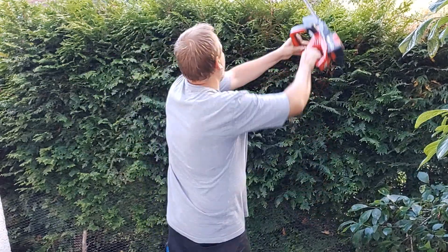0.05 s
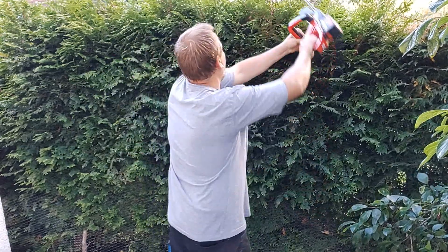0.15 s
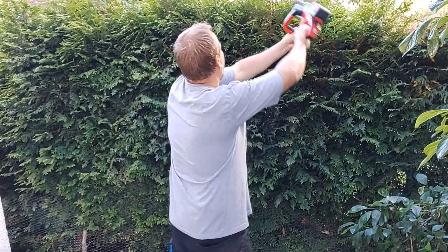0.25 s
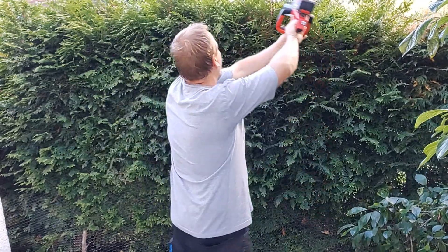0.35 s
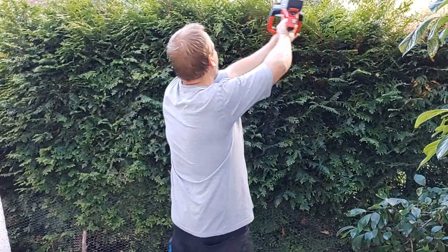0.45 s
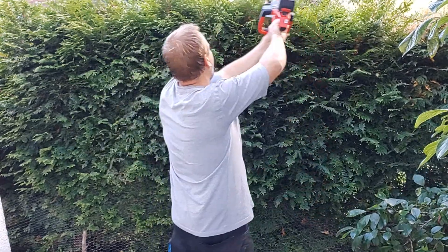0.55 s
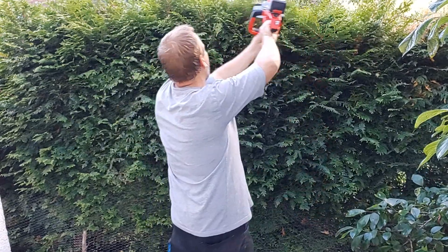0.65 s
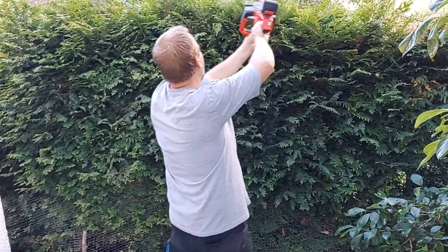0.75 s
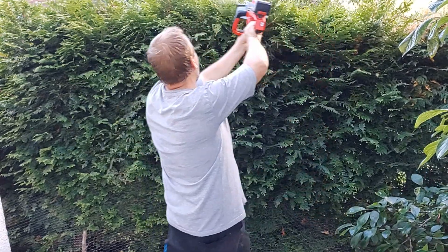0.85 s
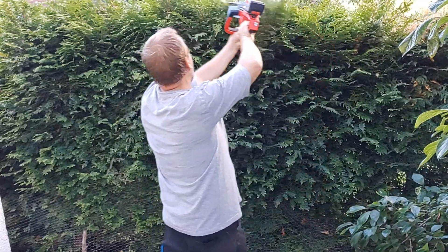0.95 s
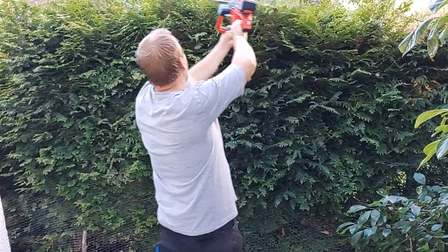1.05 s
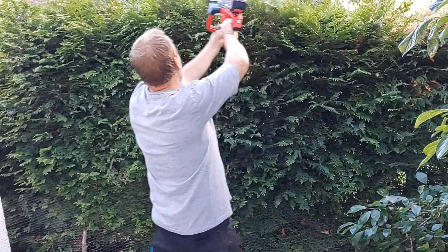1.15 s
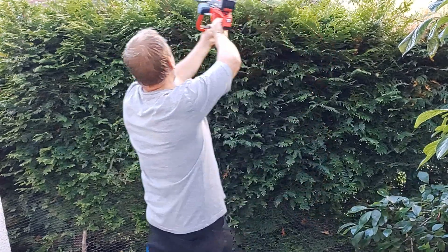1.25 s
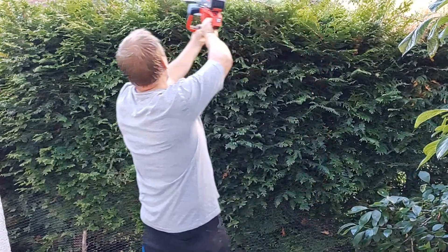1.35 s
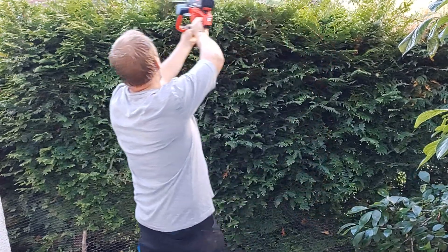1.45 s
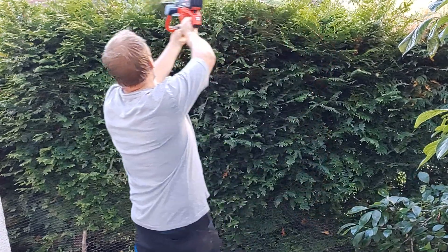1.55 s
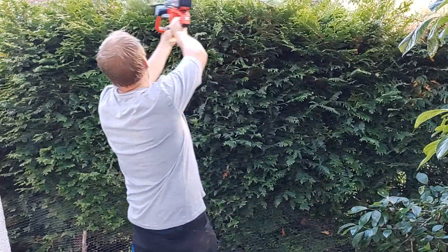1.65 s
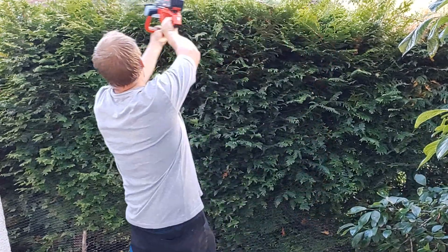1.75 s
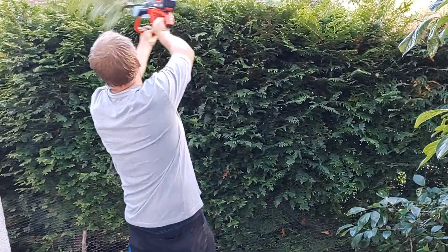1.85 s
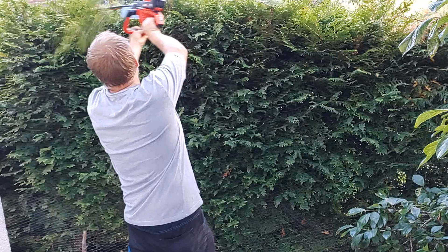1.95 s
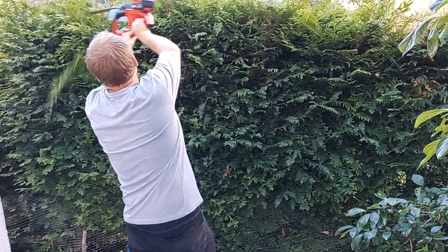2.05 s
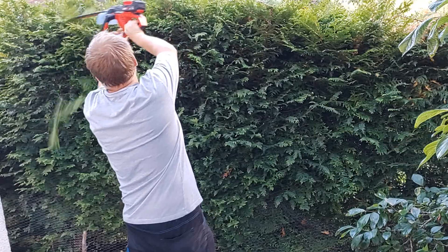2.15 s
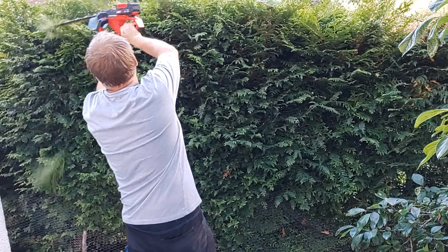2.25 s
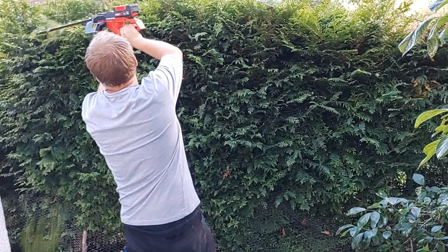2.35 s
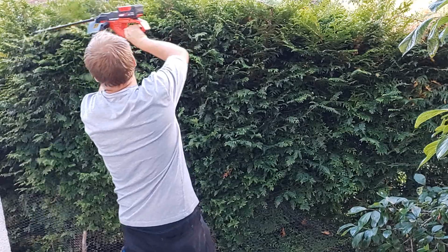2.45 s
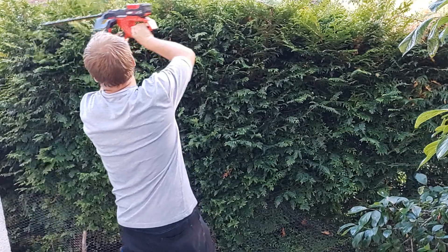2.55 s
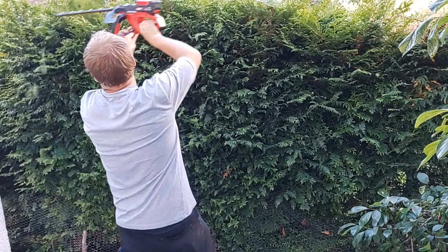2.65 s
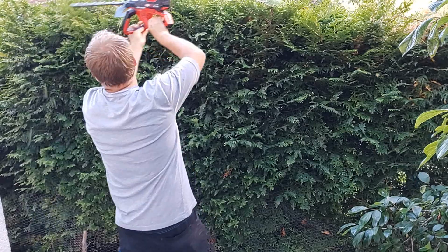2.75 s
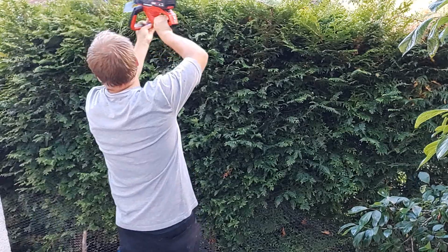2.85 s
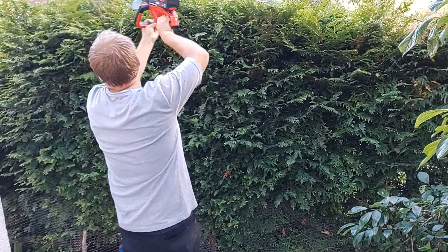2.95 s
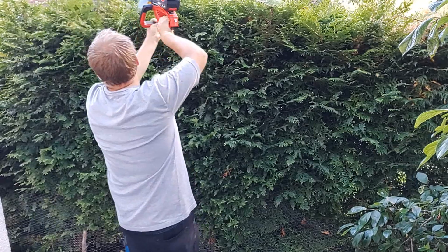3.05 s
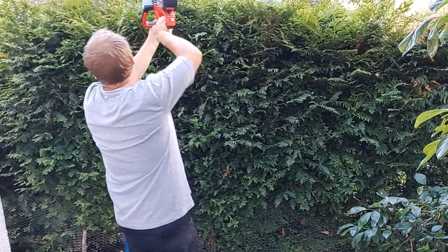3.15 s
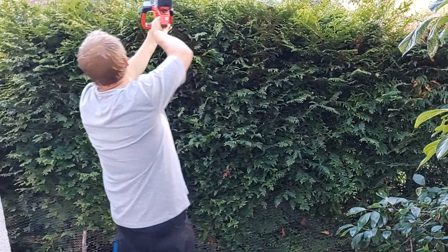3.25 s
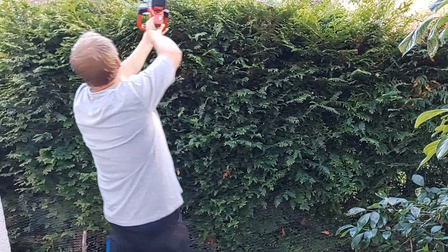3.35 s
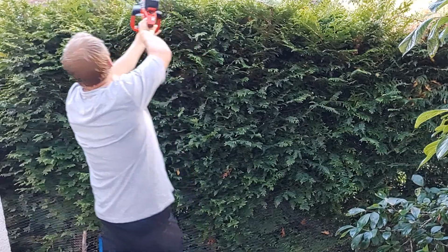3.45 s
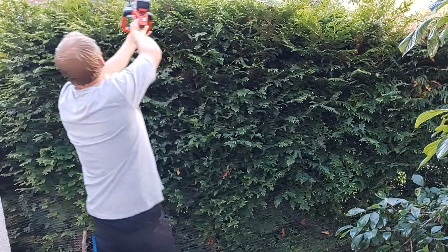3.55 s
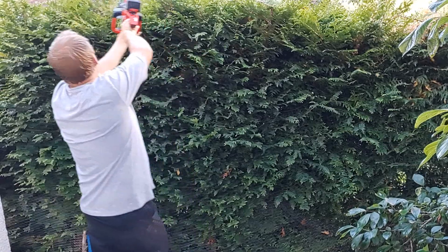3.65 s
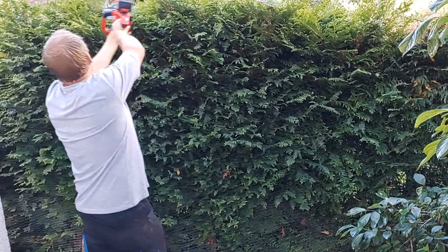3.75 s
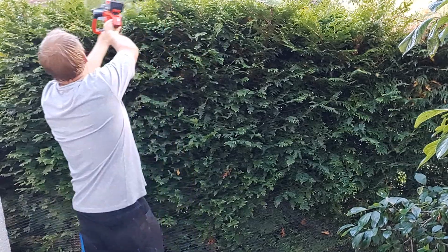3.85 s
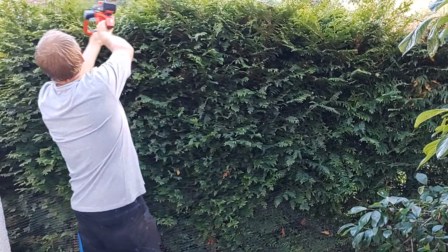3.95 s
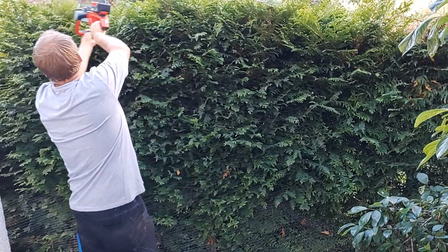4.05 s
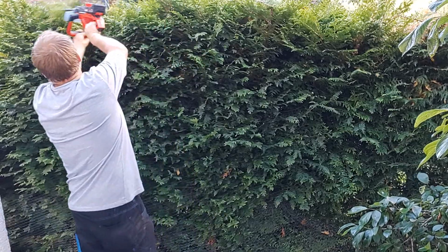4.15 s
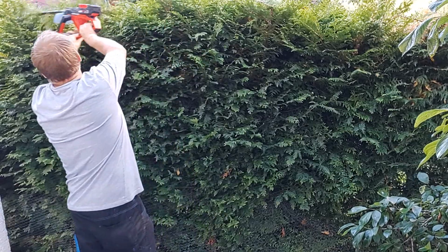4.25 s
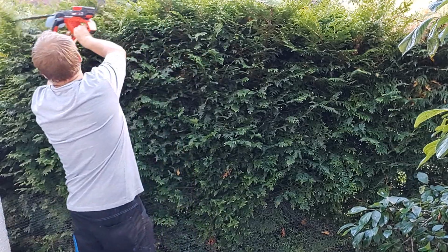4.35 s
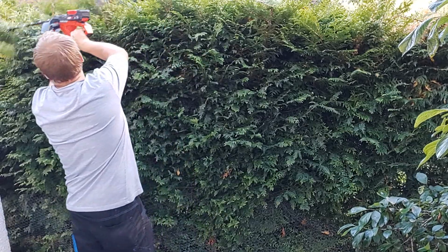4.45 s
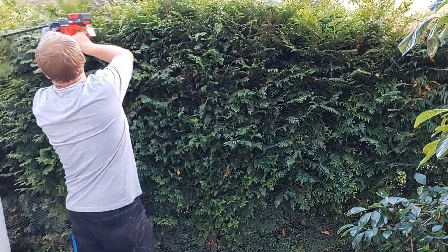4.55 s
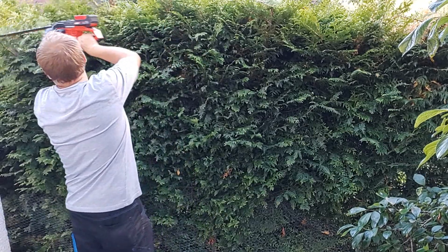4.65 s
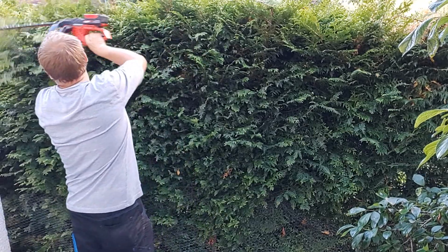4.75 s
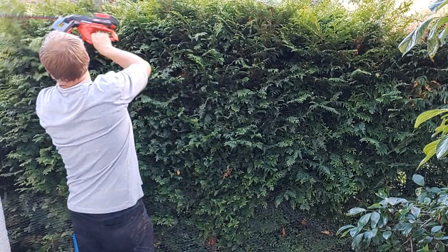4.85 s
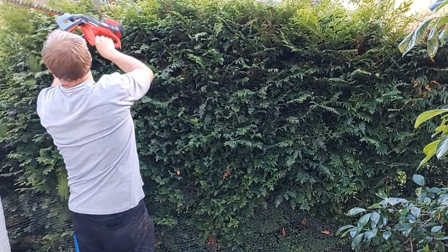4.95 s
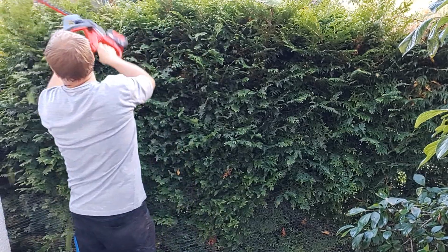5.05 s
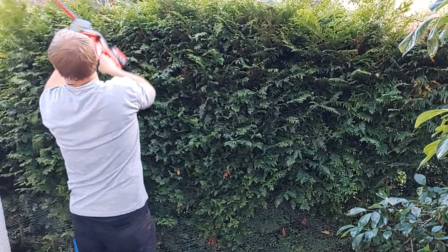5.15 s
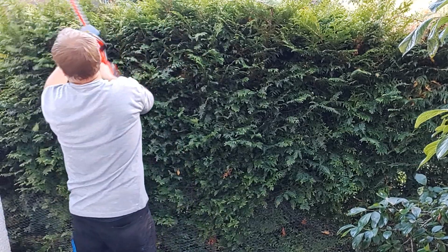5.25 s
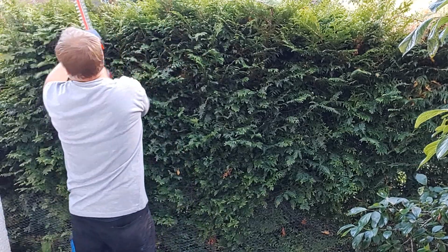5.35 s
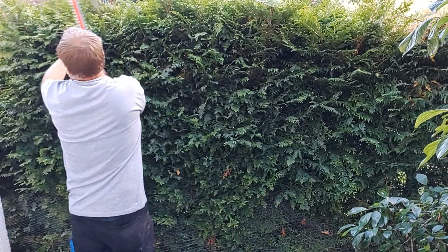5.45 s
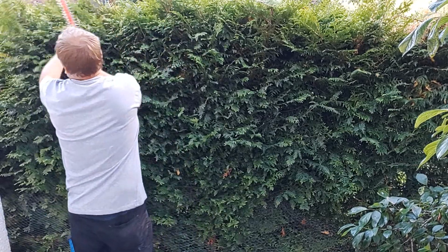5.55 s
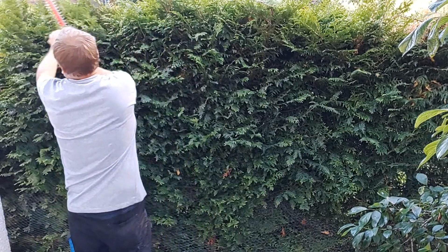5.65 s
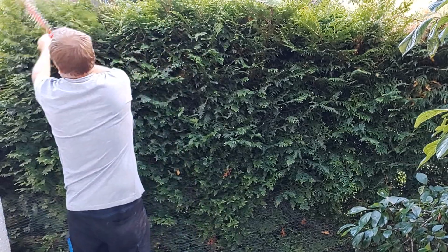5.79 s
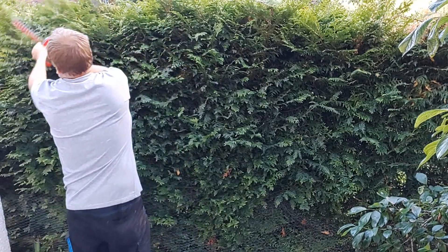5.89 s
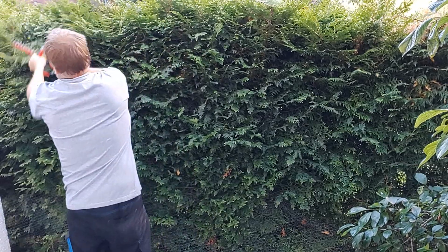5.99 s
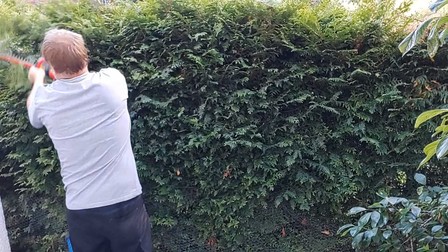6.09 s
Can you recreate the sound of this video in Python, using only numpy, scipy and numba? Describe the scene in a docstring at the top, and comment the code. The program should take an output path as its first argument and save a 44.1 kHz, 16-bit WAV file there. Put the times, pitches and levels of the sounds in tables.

```python
"""A cordless hedge trimmer, its arrival drifting from the left ear to the right; the trigger is let go twice.
Each blade reversal knocks the gear case, the blades slide and snip twigs; the motor hums, and whines
as it starts and brakes. A near sparrow calls in the second pause and during the last run, a far one
in the first pause. Hedge and walls scatter tool and birds back, over a town hush of shaped noise."""
import sys
import numpy as np
from scipy import signal
from scipy.fft import rfft, irfft, next_fast_len
from scipy.io import wavfile
from scipy.ndimage import uniform_filter1d, map_coordinates
from numba import njit

SR = 44100
rng = np.random.default_rng(int(sys.argv[2]) if len(sys.argv) > 2 else 0)


def dump_mix(stems):
    """Bounce the given channels to the path in sys.argv[1] as a 16-bit WAV at rate SR."""
    frames = np.atleast_2d(stems).T  # one column per channel
    limited = np.clip(frames, -1, 1)  # hard clip at full scale
    pcm = np.round(limited * 32767).astype(np.int16)
    wavfile.write(sys.argv[1], SR, pcm)


N = 269892
T = np.arange(N) / SR
STROKE_HZ = 39.3
DRONE_DB, PAN_DB = -42.7, -2.3  # case drone reference; left minus right
# trigger pulls: pressed t/s, released t/s, hum level/dB, start whine level/dB, brake whine level/dB
TRIGGER = [(-1, 2.643, -57, -40, -36), (3.238, 4.762, -58, -37, -41), (5.337, 7, -62, -44, -40)]


def undb(db):
    """Amplitude ratio of a level in dB."""
    return 10 ** (np.asarray(db) / 20)


def level(x, db):
    """Scale rows (shared, left, right) to the mean-square level one microphone hears."""
    return x * undb(db) / np.sqrt(np.mean(x[0] ** 2) + np.mean(x[1:] ** 2))


def read(table):
    """Columns of a curve table, interpolated to one value a sample."""
    s, *columns = np.transpose(table)
    return [np.interp(T, s, c) for c in columns]


def colour(x, spectrum):
    """Filter x by (f/Hz, level/dB) points, linear in dB over log f."""
    hz, db = np.transpose(spectrum)
    size = next_fast_len(N)
    f = np.maximum(np.arange(size // 2 + 1) * SR / size, 1)
    gain = undb(np.interp(np.log(f), np.log(hz), db, -70, -70))
    return irfft(rfft(x, size) * gain, size)[..., :N]


@njit
def svf(x, hz, width):
    """State-variable band-pass with a moving centre, gain 1 there."""
    y, b, l, g, k = np.empty(len(x)), 0., 0., 0., 0.
    for i in range(len(x)):
        if i % 32 == 0:
            g, k = np.tan(np.pi * hz[i] / SR), width / hz[i]
        v = (b + g * (x[i] - l)) / (1 + g * (g + k))
        b, l, y[i] = 2 * v - b, l + 2 * g * v, k * v
    return y


def ring(x, modes, pitch, offsets_db):
    """Sum of resonances on each row, neighbours in opposite sign, each with its own level offset."""
    gains = [(-1) ** k * undb(mode[2] + more) for k, (mode, more) in enumerate(zip(modes, offsets_db))]
    rows = []
    for row in x:
        rows.append(sum(g * svf(row, hz * pitch, 1. * width) for g, (hz, width, _) in zip(gains, modes)))
    return np.array(rows)


def walk(rate_hz):
    """Random values held 1 / rate_hz s, then slewed by two moving averages; spread near 1."""
    k = int(SR / rate_hz)
    held = np.repeat(rng.standard_normal(N // k + 1), k)
    return 1.3 * uniform_filter1d(uniform_filter1d(held, k), k)[:N]


def fade(x, tau_s):
    """Every impulse becomes an exponential tail."""
    return signal.lfilter([1], [1, -np.exp(-1 / (tau_s * SR))], x + 1e-18)


def ears(alike):
    """Noise in three rows: one both microphones share, one for each alone; alike is the shared power."""
    return rng.standard_normal((3, N)) * np.sqrt([[alike], [1 - alike], [1 - alike]])


def place(x, delay_ms, pan_db):
    """Direct sound at two spaced microphones; delay_ms is left after right."""
    lag = delay_ms * SR / 2000 + np.zeros(N)
    pair = [map_coordinates(x, [np.arange(N) - side * lag], order=2, mode="nearest") for side in (1, -1)]
    return np.array(pair) * undb(np.outer([.5, -.5], pan_db))


def garden():
    """Far traffic and leaves as shaped noise, with a bass part common to left and right."""
    # hush spectrum: f/Hz, level/dB
    hush_spectrum = [(24, -27), (40, -13), (63, -4), (120, -2), (250, -1), (500, 0), (850, -6), (1600, -6),
                     (2300, -8), (3200, -13), (6300, -21), (10000, -26), (16000, -35)]
    noise = rng.standard_normal((3, N))
    bass = signal.lfilter([.05], [1, -.95], noise)
    hush = noise[1:] - .6 * bass[1:] + .9 * bass[0]
    hush = colour(hush, hush_spectrum) * undb(1.1 * walk(3))
    return hush * undb(-53) / hush.std()


def echo(x, t60_s, db, dull):
    """Dull tail of unrelated echoes from hedge and walls; dull is the one-pole coefficient."""
    t = T[:SR // 2]
    tail = signal.lfilter([1], [1, -dull], rng.standard_normal((2, len(t))))
    tail *= undb(-60 * t / t60_s) * (t > .008)
    tail *= undb(db) / np.sqrt(np.sum(tail ** 2, axis=1, keepdims=True))
    return signal.oaconvolve(x, tail, axes=1)[:, :N]


def rustled(x):
    """Moving leaves scatter a whistle into a blurred band: random amplitude modulation."""
    return x * np.cos(.9 * walk(300)) * 1.2


def sparrow(notes, start_s, call_db, delay_ms):
    """Notes arch through three pitches in two rasping voices; the left carrier lags in phase."""
    upper_ratio = 1.12  # second voice over the first
    out = np.zeros((2, N))
    for s, length_s, from_hz, middle_hz, to_hz, db, upper_db in notes:
        first = int((start_s + s) * SR)
        u = np.linspace(0, 1, int(length_s * SR))
        arch = 1 - (2 * u - 1) ** 2
        f = from_hz + (to_hz - from_hz) * u + (middle_hz - (from_hz + to_hz) / 2) * arch
        cycles = np.cumsum(f) / SR - np.outer([delay_ms / 1000, 0], f)
        jitter = rng.standard_normal(len(u))
        cycles = cycles + .55 * uniform_filter1d(uniform_filter1d(jitter, size=60), size=60)
        rough = rng.standard_normal((2, len(u)))
        rasp = 1 + 3.0 * uniform_filter1d(uniform_filter1d(rough, size=40), size=40)
        voices = rasp[0] * np.sin(2 * np.pi * cycles)
        voices += undb(upper_db) * rasp[1] * np.sin(2 * np.pi * upper_ratio * cycles)
        out[:, first:first + len(u)] += np.sin(np.pi * u) ** .7 * undb(call_db + db) * np.sqrt(2) * voices
    return out


def far_sparrow():
    """Four short notes, nearly in phase at both microphones."""
    # notes: t/s, length/s, from f/Hz, middle f/Hz, to f/Hz, level/dB, upper voice re lower/dB
    chirps = [(3.022, .036, 3800, 4650, 4150, -52, -16), (3.052, .02, 4350, 4050, 4250, -51, -18),
              (3.075, .033, 3250, 3950, 3350, -54, -18), (3.108, .016, 4000, 3550, 2950, -54, -10)]
    return sparrow(chirps, 0, 0, .03)


def near_sparrow():
    """One seven-note call, given at each call time."""
    # notes: t from call start/s, length/s, from f/Hz, middle f/Hz, to f/Hz, level/dB, upper re lower/dB
    call = [(-.02, .024, 6000, 5300, 4800, -58, -20), (0, .016, 3250, 3850, 4250, -44, -12),
            (.013, .024, 4250, 4150, 4250, -38, -4), (.031, .02, 3600, 3250, 2800, -40, -20),
            (.068, .027, 2750, 3050, 3550, -41, -20), (.097, .012, 3900, 3300, 2900, -40, -20),
            (.106, .024, 2850, 2750, 2650, -47, -20)]
    # calls: t/s, level offset/dB
    call_times = [(4.912, 0), (5.694, -4)]
    return sum(sparrow(call, s, db, .335) for s, db in call_times)


def motor_speed():
    """0-1 for each pull: exponential run-up on pressing, even brake to a stop on release."""
    spin_up_s, brake_s = .056, .085
    pulls = []
    for on, off, *_ in TRIGGER:
        run_up = 1 - np.exp(-np.clip(T - on, 0, None) / spin_up_s)
        pulls.append(run_up * np.clip(1 - (T - off) / brake_s, 0, 1))
    return np.array(pulls)


def reversals(strokes, odd_db):
    """Impulses at blade reversals, on a steady stroke clock: regular beat, and blows with rebounds."""
    at = np.flatnonzero(np.diff(np.floor(strokes)) > 0)
    chance = rng.standard_normal((len(at), 4))
    odd = np.where(np.floor(strokes[at + 1]) % 2, .5, -.5) * odd_db[at]
    beat, blows = np.zeros((1, N)) + 1e-18, np.zeros(N)
    beat[0, at] = undb(odd)
    blows[np.clip(at + (.0007 * SR * chance[:, 0]).astype(int), 0, N - 1)] = undb(odd + 1.2 * chance[:, 1])
    # play in the drive: the blade rebounds onto the cam about 0.3 stroke later
    later = at + (SR * (.0075 + .0015 * chance[:, 2])).astype(int)
    blows[np.clip(later, 0, N - 1)] = undb(odd - 8.5 + 3.0 * chance[:, 3])
    return beat, blows


def gear_knock(blows, pitch, faces_db):
    """Blows and the rattle after them ring the gear case modes."""
    # case modes: f/Hz, width/Hz, level/dB
    case_modes = [(720, 150, -19), (930, 120, -7), (1060, 100, -3), (1320, 110, 0), (1570, 90, .5),
                  (1850, 250, -7), (2350, 400, -10), (2900, 600, -13)]
    # facing column used by each case mode
    case_face = [0, 0, 0, 1, 2, 3, 3, 3]
    # clean blow against rattle: t/s, blow strength/1
    crisp = [(0, .75), (2.6, .7), (3.3, .95), (3.9, .8), (4.8, .7), (5.4, .6), (6.12, .35)]
    rattle = (.42 * (fade(blows, .0036) - fade(blows, .0009)) + .06) * ears(.35)
    rattle[0] += read(crisp)[0] * fade(blows, .00018)
    return level(ring(rattle, case_modes, pitch * (1 + .03 * walk(35)), [faces_db[k] for k in case_face]), -.8)


def body_thump(beat):
    """Every stroke thumps the low body modes."""
    # body modes: f/Hz, width/Hz, level/dB
    body_modes = [(197, 50, -15), (240, 50, -12), (355, 45, -7), (450, 60, -10)]
    thump = ring(beat, body_modes, np.ones(N), np.zeros(len(body_modes)))[0]
    return undb(DRONE_DB - 13) * thump / thump.std()


def blade_sliding(strokes, odd_db):
    """Friction gain within each stroke: blades slide fastest between reversals."""
    within_db = 1.1 * np.cos(2 * np.pi * (strokes % 1 - .3))
    alternate_db = .2 * odd_db * np.cos(np.pi * (strokes - .7))
    return undb(within_db + alternate_db + .8 * walk(14) + .55 * walk(6))


def twig_snips():
    """Twigs part in short random snips."""
    hits = rng.random(N) < 260 / SR  # 260 a second
    return fade(hits * undb(2.6 * rng.exponential(size=N)), .0012)


def blade_slide(blows, sliding, snips, pitch, blade_db):
    """Friction hiss and blade modes, excited by sliding, snips and blows."""
    # slide spectrum: f/Hz, level/dB per Hz
    slide_spectrum = [(700, -18), (1000, -8), (1300, -5), (2200, -1), (3300, -3), (5000, -3), (6000, -5),
                      (7000, -10), (7600, -7), (8100, -13), (8480, -10), (9000, -15), (11000, -24)]
    # blade modes: f/Hz, width/Hz, level/dB
    blade_modes = [(2300, 220, 0), (2850, 250, 0), (3500, 300, -1), (4250, 350, -4), (4800, 350, -5),
                   (5600, 400, -5)]
    grit = (1 + .2 * snips + .3 * fade(np.roll(blows, 180), .005)) * sliding
    # the long blade sounds along its whole length, so its hiss differs from ear to ear
    hiss = level(colour(grit * ears(.35), slide_spectrum), -.9)
    # twigs touch and damp the blade, so its modes come and go
    damping_db = [2.2 * walk(30) for _ in blade_modes]
    blade = ring(grit * ears(.45), blade_modes, pitch * (1 + .025 * walk(9)), damping_db)
    return hiss + undb(blade_db) * level(blade, 0)


def top_hiss(sliding, snips):
    """Treble part of the sliding, softer in its swing and mostly separate in each ear."""
    # top spectrum: f/Hz, level/dB per Hz
    top_spectrum = [(7000, -22), (9000, -10), (11000, -6), (12500, -1), (14000, 0), (16000, -1)]
    swing = (1 + .1 * snips) * sliding ** .6 * undb(1.1 * walk(7) + .6 * walk(18))
    return level(colour(swing * ears(.1), top_spectrum), .1) * undb([[0], [-1.5], [1.5]])


def case_drone(blows):
    """Low noise of the case, swelling after each blow."""
    # drone spectrum: f/Hz, level/dB per Hz
    drone_spectrum = [(90, -15), (160, -11), (250, -8), (400, -2), (460, -2), (570, 1), (670, -1),
                      (850, -2), (1200, -8)]
    swell = 1 + 1.1 * fade(np.roll(blows, 150), .006)
    return level(colour(swell * ears(.75), drone_spectrum), -2.5)


def motor_tones(pulls, speed):
    """Hum at motor rotation, and whine at its fourth order; returned apart."""
    gear_ratio, order = 8.1, 4  # motor turns per blade stroke; whine cycles per turn
    _, off, hum_db, start_db, brake_db = np.transpose(TRIGGER)[:, pulls.argmax(axis=0)]
    turns = np.cumsum(speed * gear_ratio * STROKE_HZ * (1 + .0025 * walk(5))) / SR
    hum = np.sqrt(2) * undb(hum_db + 1.2 * walk(6)) * speed ** 4 * np.sin(2 * np.pi * turns)
    # the whine peaks while it sweeps through a case resonance at 640 Hz
    whine_hz = np.maximum(speed, 1e-3) * order * gear_ratio * STROKE_HZ
    passing = np.exp(-(np.log(whine_hz / 640) / .27) ** 2)
    # it wavers as it rises and judders under the brake
    braking = T > off
    rough = np.where(braking, 1.2, .8)
    whine_gain = undb(np.where(braking, brake_db, start_db) + 4.0 * rough * walk(150))
    whine = whine_gain * passing * np.sin(2 * np.pi * order * turns + 1.1 * rough * walk(250))
    return hum, whine


def switch_clicks():
    """Switch clicks and loose clatter: fading noise bursts, band-passed broadly at 2600 Hz."""
    # clicks: t/s, burst level/dB before the band-pass
    click_times = [(2.7, -29), (2.715, -33), (2.737, -30), (2.755, -39), (3.237, -30), (4.796, -21),
                   (4.82, -32), (4.843, -36), (5.337, -30), (6.1, -24)]
    clicks = np.zeros(N)
    for s, db in click_times:
        clicks[int(s * SR)] = undb(db)
    return svf(fade(clicks, .005) * rng.standard_normal(N), np.full(N, 2600.), 6000.)


def brake_jolts():
    """The brake grabs in jolts that ring the motor mount as decaying sines."""
    # jolts: t/s, level before the envelope/dB, f/Hz
    jolt_times = [(2.672, -20, 820), (2.685, -25, 680), (2.697, -32, 560), (4.789, -22, 950),
                  (4.8, -31, 800), (4.806, -29, 600)]
    out, t = np.zeros(N), T[:2000]
    for s, db, hz in jolt_times:
        envelope = np.exp(-t / .0045) * np.minimum(t / .001, 1)
        out[int(s * SR):][:len(t)] += undb(db) * envelope * np.sin(2 * np.pi * hz * t)
    return out


def lawn_echo(tool, delay_ms, db):
    """The lawn mirrors the lows (below about 800 Hz) a moment later."""
    mirrored = [map_coordinates(row, [np.arange(N) - delay_ms * SR / 1000], order=1) for row in tool]
    return undb(db) * signal.lfilter(*signal.butter(2, 800, fs=SR), mirrored)


def trimmer():
    """All parts of the tool, summed in shared/left/right rows, then placed at two microphones."""
    # sweep: t/s, strokes gained on the even pace/1, left ear delay/ms, odd over even stroke/dB,
    # case pitch factor as the tool turns/1
    sweep = [(0, .27, -.1, 7, 1.0), (.2, .28, -.11, 2, 1.0), (.55, .26, -.05, 0, 1.02),
             (.8, .07, -.02, .5, 1.03), (1.8, -.08, .08, 1.5, 1.02), (2.66, 0, .17, 0, .98),
             (3.36, .34, .09, -.3, 1.01), (3.85, .31, .14, -3.8, .99), (4.25, .38, .17, -3, .97),
             (4.78, .56, .19, 2, .97), (5.44, -.51, .16, 8, .94), (5.7, -.55, .19, 6, .89),
             (6.12, -.53, .19, 1, .92)]
    # work at full speed, before layer trims: t/s, knock level/dB, sliding level/dB, top hiss level/dB
    work = [(0, -30.2, -29.2, -33), (.26, -29.2, -29.5, -34.7), (.48, -30.9, -31.3, -36.2),
            (.8, -30.2, -30.5, -35.3), (1.05, -30.6, -30.8, -35.7), (1.3, -30.3, -30.6, -34.2),
            (1.9, -30, -29.6, -35.3), (2.06, -31.5, -30.6, -35.2), (2.25, -30.5, -29.7, -33.5),
            (2.62, -30.7, -29.1, -35), (3.4, -31.7, -32.3, -37), (3.62, -29.8, -31, -36.4),
            (3.85, -31.8, -30.8, -35.6), (4.35, -31.3, -30.8, -34.7), (4.53, -31.4, -32.7, -36.3),
            (4.75, -30.9, -30.6, -34.7), (5.47, -34.6, -33.5, -37.7), (5.8, -34, -33, -37),
            (6.085, -34.4, -32.3, -36.3), (6.105, -29, -28, -33), (6.12, -30, -29, -34)]
    # what the microphones face as the tool turns: t/s, low case modes/dB, middle mode/dB, high mode/dB,
    # upper modes/dB, blade ring/dB, drone/dB, ground echo delay/ms, ground echo/dB
    facing = [(0, 1, 0, 0, 1, -5, 0, 5.5, -16), (.4, 0, 0, 1, 0, -6, -1, 5.5, -16),
              (.9, -2, 0, 2, -1, -5, -1, 5.5, -16), (1.3, 0, 1, 0, 0, -5, -1, 5.8, -15),
              (1.8, 0, 0, 0, 0, -5, 1, 6.3, -13), (2.2, -2, 1, -3, 0, -3, 2, 6, -12),
              (2.65, -2, 0, -3, 0, -3, 1, 5.9, -11), (3.35, -5, 0, -2, 0, -4, 1, 5.6, -12),
              (3.75, -2, 1, -1, 0, -3, 1, 5.5, -7), (4.2, -2, 0, -1, -1, -3, 0, 5.45, -6),
              (4.75, -5, 0, 0, -1, -4, 1, 5.4, -6), (5.45, 1, -1, -2, 2, -5, -1, 5.3, -10),
              (6.12, 1, -2, -2, 0, -7, -1, 5.2, -10)]
    pulls = motor_speed()
    speed = pulls.max(axis=0)
    gained, delay_ms, odd_db, pitch = read(sweep)
    knock_db, slide_db, top_db = read(work)
    *faces_db, blade_db, drone_db, ground_ms, ground_db = read(facing)
    strokes = STROKE_HZ * T + gained + .21
    beat, blows = reversals(strokes, odd_db)
    sliding, snips = blade_sliding(strokes, odd_db), twig_snips()
    # the knock needs speed to build up
    tool = undb(knock_db) * gear_knock(blows, pitch, faces_db) * speed ** 1.2
    tool += undb(slide_db) * blade_slide(blows, sliding, snips, pitch, blade_db)
    tool += undb(top_db) * top_hiss(sliding, snips) * speed ** .3
    tool += undb(DRONE_DB + drone_db) * case_drone(blows)
    hum, whine = motor_tones(pulls, speed)
    tool[0] += body_thump(beat) + hum
    tool *= speed ** .8
    tool[0] += whine + switch_clicks() + brake_jolts()
    tool += lawn_echo(tool, ground_ms, ground_db)
    return place(tool[0], delay_ms, PAN_DB) + tool[1:] * undb(np.outer([.5, -.5], PAN_DB))


def scene():
    """Tool and sparrows with their echoes, over the garden."""
    tool, near, far = trimmer(), near_sparrow(), far_sparrow()
    tool_echo = echo(tool, .4, -15, .5)
    bird_echo = echo(rustled(near + undb(5.0) * far), .5, -7, .2)
    return tool + tool_echo + near + far + bird_echo + garden()


def record(dry):
    """The phone cuts the top: steep elliptic low-pass at 16050 Hz."""
    return signal.sosfilt(signal.ellip(12, .2, 75, 16050, fs=SR, output="sos"), dry)


dry = scene()
out = record(dry)
dump_mix(out)
```